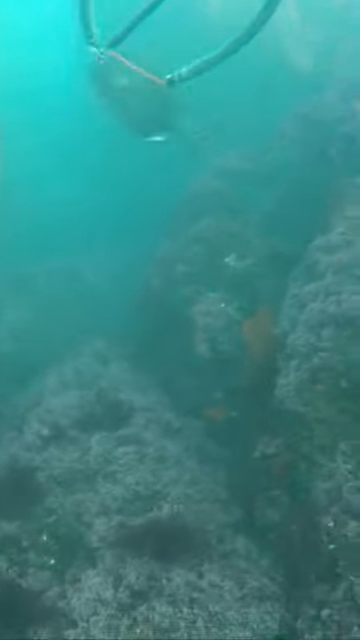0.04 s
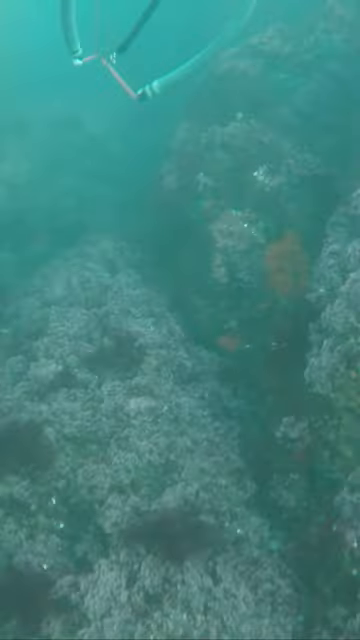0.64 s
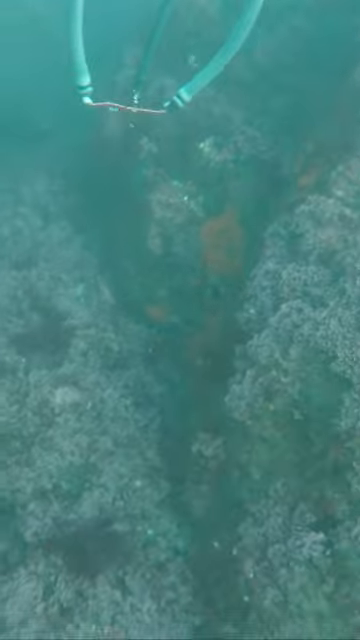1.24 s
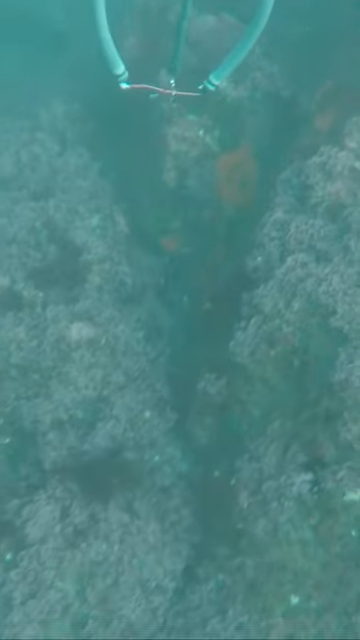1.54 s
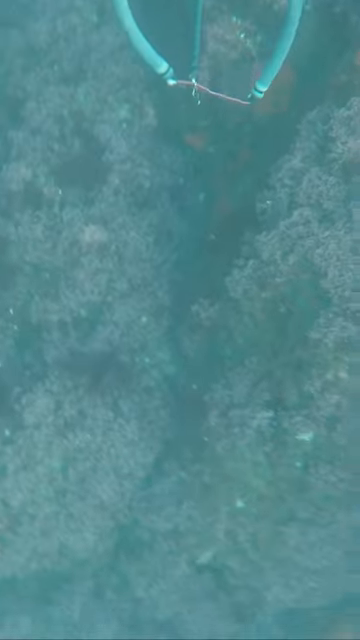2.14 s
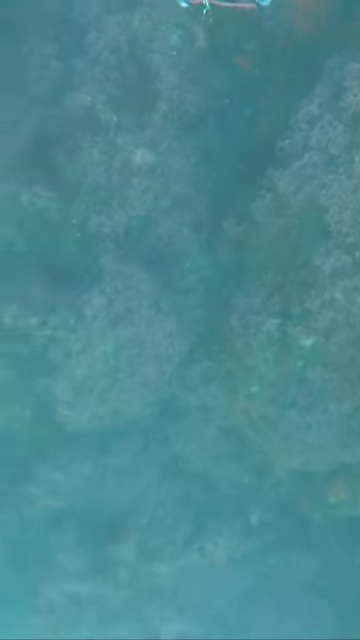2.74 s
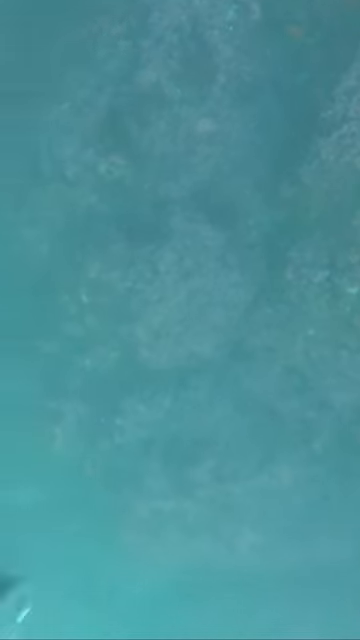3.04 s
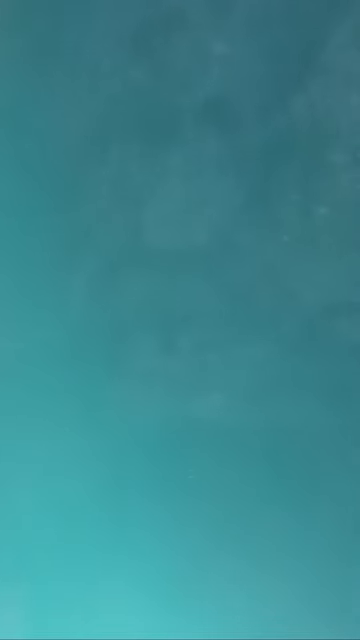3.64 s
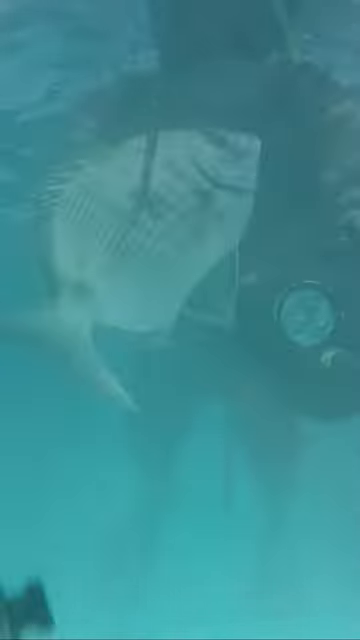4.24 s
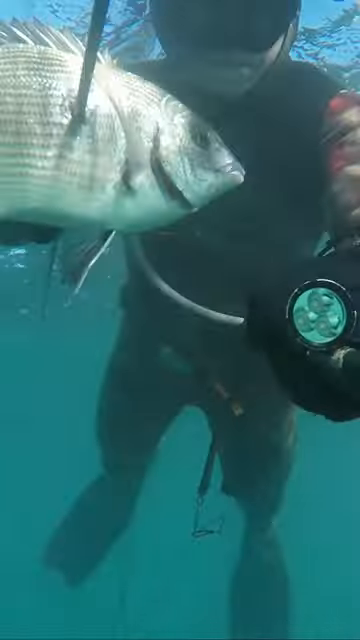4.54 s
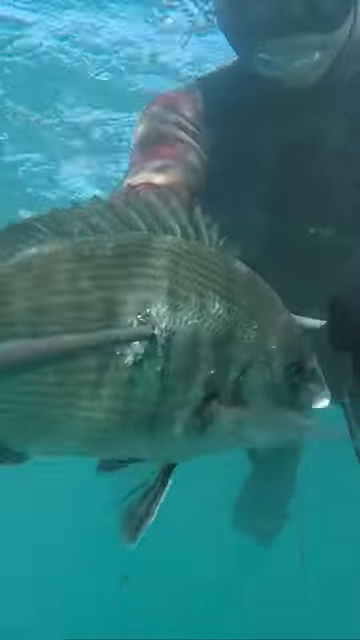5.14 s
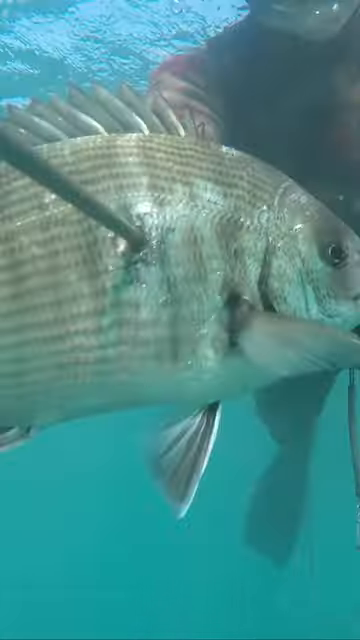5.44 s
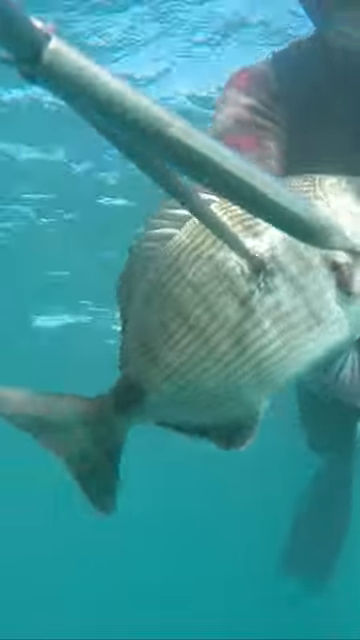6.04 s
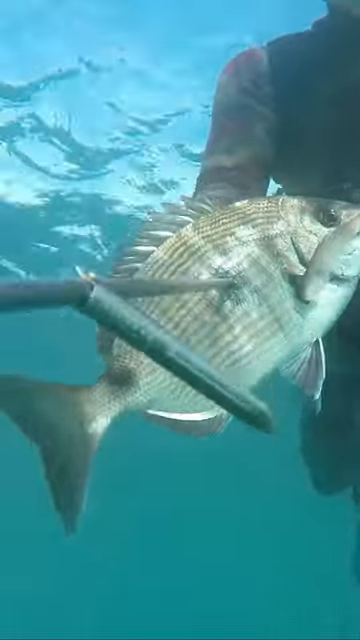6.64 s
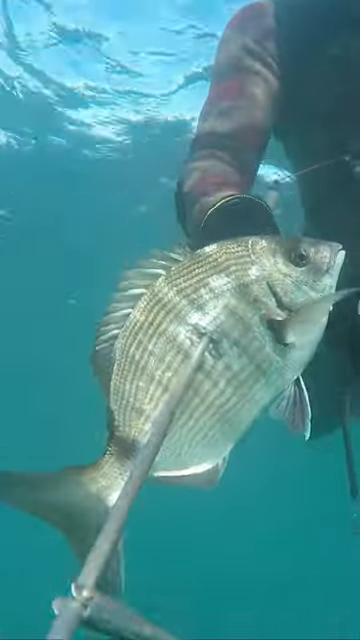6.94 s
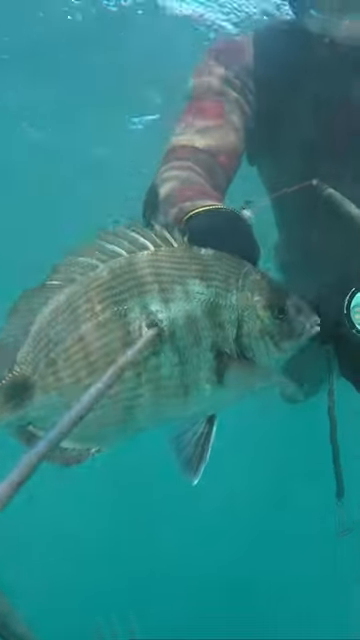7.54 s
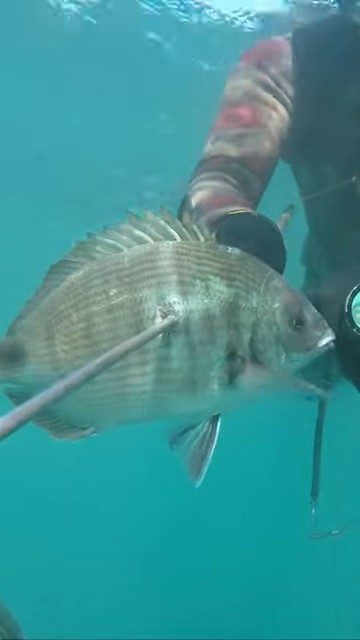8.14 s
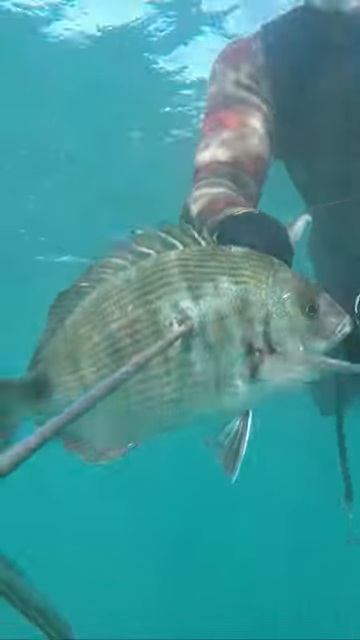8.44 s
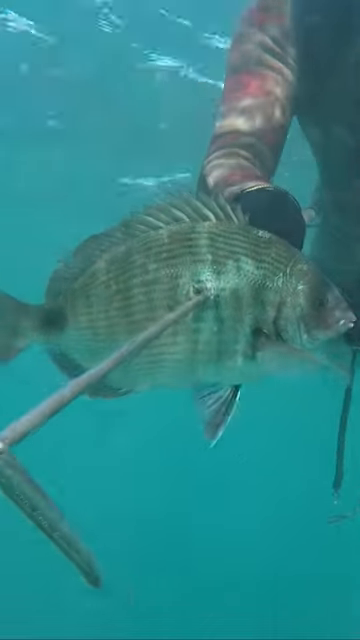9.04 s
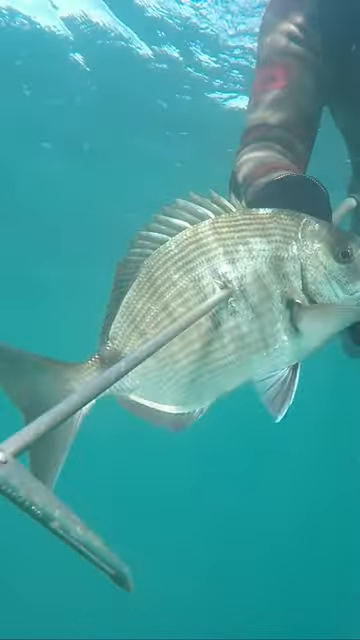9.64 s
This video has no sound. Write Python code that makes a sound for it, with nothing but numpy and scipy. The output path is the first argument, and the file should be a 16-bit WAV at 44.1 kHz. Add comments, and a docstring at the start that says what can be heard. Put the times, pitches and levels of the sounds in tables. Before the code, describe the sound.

Deep underwater rumble with snapping shrimp crackling and small bubbles gurgling, broken by a loud burst of knocks and rubs on the camera housing.

```python
"""A deep, surging underwater rumble: moving water pushes on a camera housing carried by a diver.
Snapping shrimp crackle all round the rocky reef, and small bubbles gurgle, fizz and pop. Midway the camera
turns to open water: the crackle rings its front window and a wave washes overhead. The case is knocked,
shoved and rubbed, once hard enough to make the limiter duck everything for a moment."""
import sys
import numpy as np
from scipy import signal
from scipy.fft import rfft, irfft, next_fast_len
from scipy.io import wavfile
from scipy.ndimage import map_coordinates

SR = 44100
rng = np.random.default_rng(int(sys.argv[2]) if len(sys.argv) > 2 else 0)


def int16_out(signal):
    """Quantize to a 16-bit WAV file."""
    q = np.round(np.clip(np.atleast_2d(signal).T, -1, 1) * 32767)
    wavfile.write(sys.argv[1], SR, q.astype(np.int16))


N = 432180
TURN_S, TURN_LENGTH_S = 4.44, 0.022  # the camera turns from the reef to open water

# push of the water on the case: t/s, relative level/dB
WATER_PUSH = [(0.0, 3), (0.3, 1), (1.1, -10), (1.42, -2.5), (1.72, -11.5), (1.84, -6.5), (2.05, -9.5),
              (2.6, -2.5), (2.8, -12.5), (3.48, -5.5), (3.68, -10.5), (4.4, -7.5), (4.52, -4), (4.8, -2.5),
              (5.0, 1), (5.12, -13), (5.26, 5), (5.37, -10), (5.52, 5.5), (5.76, -0.5), (6.44, 11),
              (6.8, 16), (6.96, -2), (7.2, 5.5), (7.4, -2), (7.72, -2), (8.0, 4.5), (8.24, -13), (8.35, -1),
              (8.52, 7), (8.75, 3.5), (8.92, -0.5), (9.14, 2.5), (9.8, -14)]
# tone of the sub-bass sway, the bass buffeting and the low-mid eddies: f/Hz, level/dB
SWAY_EQ = [(8,-22),(15,-8.5),(20.5,-0.5),(27,-5.5),(40,-28.5),(70,-98.5),(200,-125)]
BUFFET_EQ = [(20,-35),(34,2),(46,-1.5),(62,-6),(80,-26),(130,-33.5),(300,-62.5),(800,-125)]
EDDY_EQ = [(50,-24.5),(90,7),(115,6),(155,-3),(200,-8),(300,-11.5),(390,-13),(520,-14),(900,-36.5),(3000,-110)]


def water_rumble():
    """Water sways and buffets the case and sheds eddies at its edges; all three grow with the flow."""
    flow_db, = curves(WATER_PUSH)
    sway_db = -33.5 + 0.66 * flow_db + wobble(rate=5, depth_db=1.5)
    sway = amp(sway_db) * swell(SWAY_EQ, evenness=.7)
    buffet_db = -43 + 0.82 * flow_db + wobble(rate=9, depth_db=2.5)
    buffet = amp(buffet_db) * swell(BUFFET_EQ, evenness=.4)
    eddy_db = turned(reef=-61, open_water=-65.5) + 0.34 * flow_db + wobble(rate=12, depth_db=2.8)
    return sway + buffet + amp(eddy_db) * swell(EDDY_EQ, evenness=0.088)


def swell(eq, evenness):
    """Low random pressure waves of rms 1, with their beats partly evened out."""
    wave = coloured(rng.standard_normal(N + SR), eq, size=32768)[SR:]
    envelope = np.abs(signal.hilbert(unit(wave)))
    return unit(wave / (envelope + 1.1) ** evenness)


# blows on the case: t/s, peak level/dB, hardness f/Hz
CASE_KNOCKS = [(0.886,-33,3020),(1.426,-42.5,1400),(2.154,-46,600),(4.36,-43,497),(5.026,-43,1300),(5.860,-32.5,1000),(6.379,-11,795),(6.396,-13,896),(6.476,-9,2980),(6.483,-14.5,1200),(6.526,-9,1590),(6.531,-26,2000),(6.546,-27,1780),(6.575,-23.5,900),(8.166,-42.5,1300),(8.582,-46,1010),(8.733,-41,1000)]
# soft shoves and dull thuds: centre t/s, peak level/dB, f/Hz, half length/s
CASE_SHOVES = [(0.894,-35,74.6,0.0075),(1.225,-43,118,0.015),(1.432,-24.5,32,0.013),(2.421,-46,51.5,0.047),(2.601,-37.5,55.7,0.019),(3.391,-38.5,90,0.02),(3.484,-45,132,0.02),(4.383,-33.5,61.7,0.024),(4.697,-25.5,77.6,0.0084),(4.74,-28,104,0.0092),(4.775,-48,145,.014),(4.823,-36,106,0.0049),
               (5.813,-30,270,0.0012),(5.832,-31,390,0.005),(5.837,-20.5,104,0.01),(5.851,-17,63,0.0052),(5.882,-22,29.8,0.042),(6.35,-22,185,0.0064),(6.374,-13,75.6,0.0059),(6.411,-13,100,0.0073),(6.542,-2,39,0.017),(6.546,-20,102,0.017),(6.58,-10.5,26.5,0.023),(7.964,-20,51,0.025),(8.579,-25,22.88,0.24)]
# rubs along the case: t/s, length/s, level/dB, hardness f/Hz
CASE_RUBS = [(0.308, 0.016, -57, 400), (1.187, 0.096, -52, 60), (4.675, 0.097, -49.5, 110),
             (5.513, .13, -56, 457), (5.808, 0.035, -33.5, 130), (6.26, 0.095, -48, 1020),
             (6.331, 0.032, -28.5, 400), (6.376, 0.017, -20.5, 500), (6.408, 0.031, -20.5, 1000),
             (6.436, 0.035, -24, 1300), (6.479, 0.01, -20, 1110), (8.35, 0.45, -61, 258),
             (9.323, 0.087, -53, 557)]


def handling():
    """Knocks and stick-slip rubs ring the case; shoves rock it with a low thud."""
    out, t = np.zeros(N), np.arange(SR // 2) / SR
    for s, db, hard_hz in CASE_KNOCKS:
        blow = (t == 0) + 0.094 * rng.standard_normal(len(t)) * decay(t, t60=0.03)
        add(out, s, amp(db) * peak(housing(blow, hard_hz)))
    centred = t - t.mean()
    for s, db, hz, half_s in CASE_SHOVES:
        thud = np.cos(2 * np.pi * hz * centred) * np.exp(-(centred / half_s) ** 2)
        add(out, s - t.mean(), amp(db) * thud)
    for s, length, db, hard_hz in CASE_RUBS:
        slips = impulses(rate=2500, spread_db=2.5, most_db=6)[:len(t)]
        pressure = np.clip(np.minimum(t, length - t) / (.16 * length), 0, 1)
        rub = housing(slips * pressure, hard_hz)
        rms = np.sqrt(np.sum(rub ** 2) / (length * SR))
        add(out, s, amp(db) * rub / rms)
    return out


# resonances of the housing: f/Hz, width/Hz, level/dB
CASE_MODES = [(110,12,8.5),(185,22,1.5),(235,17,-6),(345.5,55,2.5),(409,61.5,4.5),(510,52,-1.5),(680,39.6,5),(973,52,-5.5),(1005,51,-4),(1570,180,-4.5),(1850,190,-4),(2550,320,-16),(3320,310,-14.5)]


def housing(force, hard_hz, wall_hz=4500):
    """The case rings; a softer contact reaches fewer modes, and the wall rolls off the top."""
    def response(f):
        contact = (1 + 1j * f / hard_hz) ** -2
        return resonances(CASE_MODES, f) * contact / np.sqrt(1 + (f / wall_hz) ** 6)
    return filtered(force, response)


# foreground claw snaps: t/s, peak level/dB, treble shelf/dB, echo level/dB
CLAW_SNAPS = [(0.0915, -39.5, -28, -4), (0.333, -43.5, 9, 4), (0.9128, -42, -6, 4), (1.2291, -31.5, -9, -7),
              (1.2447, -41, -18, -17), (1.3437, -30.5, -5, -3), (1.499, -34, 6, -8), (1.925, -39, -2, -10),
              (2.228, -32, -16, -23), (2.2757, -33.5, -12, 0), (2.4204, -41, -18, -14),
              (2.7173, -36, 5, -17), (3.0547, -37, 2, -14), (3.1243, -35, -1, 14), (3.479, -37, 2, -8),
              (4.202, -37, -16, 0), (4.289, -37.5, -9, -14), (4.3953, -35, -32, -11),
              (4.425, -27.5, -12, -20), (5.2052, -42.5, -6, 4), (5.3079, -27, 0, -25),
              (5.3472, -36.5, 5, -7), (5.612, -44, 4, 4), (5.6756, -48, 13, -17), (5.953, -24, 12.5, -15),
              (6.294, -37, -20, 0), (6.573, -35, 6, 1), (7.1065, -25.5, -17, -10), (7.352, -47, 18.5, -21),
              (7.431, -41, -10, 23), (7.6, -41, -14, 10), (7.6285, -36.5, -28, 13),
              (7.7824, -32.5, -15, -21), (7.9579, -34, 4, -14), (7.974, -39.5, -8, 5), (8.1395, -46, -1, 8),
              (8.201, -41, -17, 17), (8.46, -42.5, -14, 25), (8.568, -38, -23, -1), (8.675, -42.5, -4, -2),
              (8.708, -41, -5, -1), (8.8005, -38.5, 23, -29), (8.918, -56, 14, -15),
              (9.3537, -34.5, -15, -8.5), (9.4618, -18.5, -9, -10.5)]


def near_shrimp():
    """Single shrimp snap their claws close by."""
    out = np.zeros(N)
    for s, db, treble_db, echo_db in CLAW_SNAPS:
        add(out, s, amp(db) * peak(snap(echo_db, treble_db)))
    return out


# tone of a snap through the wall of the case: f/Hz, level/dB
SNAP_EQ = [(400,-18),(1300,-17),(1700,2.5),(2100,-5.5),(2650,-2),(3700,-1),(4650,-7),(5800,-7),(6600,-10.5),(7700,-11),(9400,-19),(10500,-13.5),(13000,-17.5),(15500,-21)]


def snap(echo_db, treble_db, shelf_hz=6000):
    """One crack, with a short tail scattered off rocks and surface."""
    t = np.arange(SR // 8) / SR
    direct = 1.6 * decay(t, t60=.003) + .7 * decay(t, t60=.016)
    echo = amp(echo_db) * decay(t, t60=.11)
    crack = coloured(rng.standard_normal(len(t)) * (direct + echo), SNAP_EQ)
    return filtered(crack, lambda f: amp(treble_db * f * f / (f * f + shelf_hz ** 2)))


# fader ride of the shrimp bed: t/s, level/dB
SHRIMP_RIDE = [(0, -69.5), (.35, -63), (1.05, -69.5), (1.3, -65), (2.2, -64), (4, -65), (4.8, -64),
               (5.3, -62), (6.2, -61.5), (6.8, -61.5), (7.5, -63.5), (8.35, -64), (8.55, -62.5), (9.4, -63),
               (9.8, -61.5)]


def shrimp_bed():
    """Colonies snap in flurries, each with its own colour; the farthest merge into a sizzle."""
    level_db = curves(SHRIMP_RIDE)[0] + wobble(rate=9, depth_db=1.3)
    colonies = np.zeros(N)
    for hz in np.geomspace(2200, 11000, num=12):
        flurries = amp(wobble(rate=4, depth_db=5))
        claws = impulses(rate=9 * flurries, spread_db=4, most_db=12)
        crack = coloured(snap(echo_db=-3, treble_db=-2), [(hz / 2, -11), (hz, 0), (hz * 2, -16)])
        colonies += signal.oaconvolve(unit(claws), crack)[:N]
    sizzle = coloured(rng.standard_normal(N), SNAP_EQ)
    sizzle = coloured(sizzle, [(11000, 0.0051), (15000, 8)])  # air at the very top
    bed = unit(unit(colonies) + 0.61 * unit(sizzle))
    return amp(level_db) * (bed + amp(-15.5) * dry_ticks(rate=9, colours=8))


# tone of the dry ticks: f/Hz, level/dB
TICK_EQ = [(1500,-20.5),(3500,-3),(7500,7.5),(11000,-4.5),(15500,-8)]


def dry_ticks(rate, colours):
    """Crisp little snaps that arrive with no echo."""
    t = np.arange(SR // 50) / SR
    ticks = np.zeros(N)
    for crack in rng.standard_normal((colours, len(t))) * decay(t, t60=.004):
        ticks += signal.oaconvolve(impulses(rate / colours, spread_db=2, most_db=15.5), crack)[:N]
    return unit(coloured(ticks, TICK_EQ))


# resonances of the front window: f/Hz, width/Hz, level/dB
WINDOW_MODES = [(2520,1460,-4.5),(4015,390,2.5),(4980,390,-5),(6000,140,4.5),(7750,760,0.5),(10470,1900,-1.5)]


def through_window(crackle):
    """Once the camera faces open water, the crackle rings the front window."""
    hz = np.geomspace(300, 16000, num=200)
    gain_db = 20 * np.log10(np.hypot(.55, np.abs(resonances(WINDOW_MODES, hz))))
    return turned(crackle, coloured(crackle, np.column_stack([hz, gain_db])))


# single bubbles close to the case: t/s, peak level/dB, f/Hz, ring length/cycles
CLOSE_BUBBLES = [(.885, -28.5, 1540, 5.6), (1.068, -44.5, 807, 36), (1.208, -43.5, 783, 49),
                 (1.277, -38, 2570, 80), (1.286, -42.5, 910, 20), (1.286, -30.5, 2450, 63),
                 (1.351, -43, 745, 24), (1.403, -34.5, 2055, 110), (1.403, -39.5, 694, 40),
                 (1.465, -34.5, 1780, 53), (1.466, -43, 760, 20), (1.514, -39.5, 722, 52),
                 (1.588, -38.5, 1714, 130), (1.592, -45, 660, 35), (1.866, -43, 2560, 170),
                 (2.254, -38.5, 1100, 44), (2.258, -36.5, 2290, 44), (2.492, -38.5, 680, 74),
                 (2.687, -38, 715, 48), (2.955, -39.5, 1834, 61), (3.144, -35, 1803, 160),
                 (3.143, -43.5, 1510, 180), (3.147, -43, 810, 38), (3.279, -45, 814, 74),
                 (3.33, -45.5, 698, 49), (3.476, -31.5, 820, 55), (3.483, -34, 1800, 91),
                 (3.659, -45.5, 1815, 210), (4.007, -43.5, 1630, 160), (4.305, -42.5, 760, 16),
                 (4.724, -45, 1695, 74), (5.113, -47.5, 760, 35), (5.263, -47.5, 980, 93),
                 (5.861, -38, 1550, 3.6), (5.933, -47, 644, 21), (6.093, -44, 640, 25),
                 (6.571, -32.5, 1780, 190), (7.39, -47.5, 746, 17), (9.631, -35, 688, 24),
                 (9.703, -45.5, 644, 51)]
# bubbles breaking up on the case: t/s, peak level/dB
CLOSE_POPS = [(1.394, -40), (1.429, -55), (2.026, -41), (2.11, -41), (2.307, -43), (2.345, -37),
              (2.380, -37), (2.453, -43), (2.466, -34), (2.47, -35), (2.4959, -36), (2.5039, -26.5),
              (2.511, -29), (2.5257, -33.5), (2.549, -35.5), (2.5657, -34), (2.573, -38.5), (2.591, -35),
              (2.613, -46), (2.655, -45)]


def near_bubbles():
    """Close bubbles pinch off with a splash around their own pitch and ring; others break with a pop."""
    out, t = np.zeros(N), np.arange(SR // 8) / SR
    for s, db, hz, cycles in CLOSE_BUBBLES:
        spray = rng.standard_normal(len(t)) * decay(t, t60=0.013 + 0.6 * cycles / hz)
        band = [(hz / 3, -36), (hz * .72, -9), (hz, 0), (hz * 1.33, -9), (hz * 2.2, -35), (hz * 6, -58)]
        splash = peak(coloured(spray, band))
        add(out, s, amp(db) * peak(bubble(t, hz, cycles, glide=-.03) + .7 * splash))
    for s, db in CLOSE_POPS:
        add(out, s, amp(db) * peak(dry_pop()))
    return out


def bubble(t, hz, cycles, glide):
    """A bubble swings up within a cycle or two, then rings down while its pitch glides."""
    age = hz * t / cycles
    attack = (1 - np.exp(-hz * t)) ** 2
    return np.sin(2 * np.pi * hz * t * (1 + glide * age)) * attack * decay(t, t60=cycles / hz)


# tone of a dry pop: f/Hz, level/dB
POP_EQ = [(450,-28),(700,-4.5),(1200,-11),(1550,4),(2350,2),(2900,-26.5),(3400,-4.5),(4300,-25.5),(9000,-36)]


def dry_pop():
    """A bubble breaks up: a short dry spray, pitched a little differently each time."""
    t = np.arange(SR // 8) / SR
    detune = np.exp(.07 * rng.standard_normal())
    spray = rng.standard_normal(len(t)) * decay(t, t60=0.019)
    return coloured(spray, [(hz * detune, db) for hz, db in POP_EQ])


# fader ride of the drifting bubbles: t/s, gurgle level/dB, fizz level/dB
BUBBLE_RIDE = [(0, -65.5, -86), (.17, -61.5, -72), (.4, -86, -77), (.65, -65, -67.5), (1.15, -79, -79.5),
               (1.3, -61, -72), (1.55, -61, -66), (1.8, -63.5, -66.5), (2.2, -66.5, -56),
               (2.55, -53.5, -60), (2.8, -63.5, -68), (3.25, -60.5, -66.5), (3.7, -65.5, -72.5),
               (4.7, -67.5, -86), (4.98, -71, -68), (5.1, -59.5, -67.5), (5.45, -68, -71.5),
               (7.2, -65.5, -77.5), (8.9, -65, -72), (9.8, -66.5, -72.5)]
# tone of the large gurgling bubbles and of the small fizzing ones: f/Hz, level/dB
GURGLE_EQ = [(250,-47),(520,-3),(670,4),(800,0.5),(970,-2),(1200,-17),(2000,-53.5)]
FIZZ_EQ = [(400, -26), (660, -4), (850, -12.5), (1080, 0), (1300, -2.5), (1650, 4), (2050, -10.5),
           (2450, 10), (2950, -20), (3550, -7), (4200, -38), (5000, -26), (9000, -37)]


def bubble_stream():
    """Bubbles drift past, thickest over the reef: large ones gurgle, small ones fizz and sputter."""
    gurgle_db, fizz_db = curves(BUBBLE_RIDE)
    near = bubble_cloud(centre_hz=810, scatter=0.2, cycles=22, count=1100)
    far = bubble_cloud(centre_hz=760, scatter=0.28, cycles=13, count=3500)
    gurgle = unit(coloured(turned(reef=near, open_water=far), GURGLE_EQ))
    small = bubble_cloud(centre_hz=1900, scatter=.45, cycles=4, count=9000, spread_db=3)
    tiny = unit(impulses(rate=660, spread_db=8, most_db=9))  # the tiniest only tick
    fizz = unit(coloured(small + 2.2 * tiny, FIZZ_EQ))
    fizz = unit(fizz + amp(-0.5) * sputter(rate=170, colours=8))
    return amp(gurgle_db + wobble(rate=16, depth_db=3)) * gurgle + amp(fizz_db) * fizz


def bubble_runs():
    """A short run of big, low glugs and a trail of small ringing blips drift by."""
    glugs = bubble_cloud(centre_hz=202, scatter=0.36, cycles=5.2, count=1500)
    blips = bubble_cloud(centre_hz=1550, scatter=0.22, cycles=45, count=450)
    return (glugs * pass_by(middle_s=4.07, half_s=0.18, db=-55.5)
            + blips * pass_by(middle_s=3.5, half_s=0.66, db=-65.5))


def bubble_cloud(centre_hz, scatter, cycles, count, spread_db=3.5):
    """Many bubbles of random strength and pitch; some only tick, some ring."""
    t = np.arange(int(1.5 * SR * cycles / centre_hz)) / SR
    start = rng.integers(0, N, (count, 1))
    hz = centre_hz * np.exp(scatter * rng.standard_normal((count, 1)))
    life = cycles * np.exp(.5 * rng.standard_normal((count, 1)))
    strength = amp(spread_db * np.minimum(rng.exponential(size=(count, 1)), 3))
    fade_out = 1 - (t / t[-1]) ** 4
    rings = strength * bubble(t, hz, life, glide=0.055) * fade_out
    positions = start + np.arange(len(t))
    return unit(np.bincount(positions.ravel(), rings.ravel(), N)[:N])


def sputter(rate, colours):
    """Bubbles break in weak dry pops at random times."""
    out = np.zeros(N)
    for _ in range(colours):
        out += signal.oaconvolve(impulses(rate / colours, spread_db=4.5, most_db=9.5), dry_pop())[:N]
    return unit(out)


# hollow tone of the surf through the case: f/Hz, level/dB
SURF_EQ = [(200,-20.5),(400,-10),(540,-12),(660,2.5),(790,-13),(1000,-8.5),(1250,-24.5),(1650,-9.5),(1850,-4),(2150,-46),(4000,-29),(8000,-41)]


def surf(crest_s=4.70, crest_db=-54.5, rise_s=0.06, fade_s=0.2):
    """Distant waves make a steady wash; one overhead rises quickly and fades."""
    age = np.arange(N) / SR - crest_s
    wave = np.clip(1 + age / rise_s, 0, 1) * np.exp(-np.maximum(age, 0) / fade_s)
    level = np.hypot(amp(turned(reef=-71, open_water=-67.5)), amp(crest_db) * wave)
    return level * unit(coloured(rng.standard_normal(N), SURF_EQ))


def turned(reef, open_water):
    """Crossfade as the camera turns away from the reef."""
    facing = np.clip((np.arange(N) / SR - TURN_S) / TURN_LENGTH_S, 0, 1)
    return (1 - facing) * reef + facing * open_water


def pass_by(middle_s, half_s, db):
    """The gain of something that drifts up to the camera and away again."""
    return amp(db) * np.exp(-((np.arange(N) / SR - middle_s) / half_s) ** 2)


def wobble(rate, depth_db):
    """A smooth random level in dB, through rate points a second."""
    points = rng.standard_normal(int(N * rate / SR) + 4)
    return depth_db * map_coordinates(points, [np.arange(N) * rate / SR])


def impulses(rate, spread_db, most_db):
    """Random clicks, about rate a second: many weak, a few strong."""
    strength = amp(np.minimum(spread_db * rng.exponential(size=N), most_db))
    return strength * rng.choice([-1, 1], N) * (rng.random(N) < rate / SR)


def resonances(modes, f):
    """Complex response of a bank of modes of alternating polarity."""
    return sum((-1) ** k * amp(db) * 1j * f * width / (hz * hz - f * f + 1j * f * width)
               for k, (hz, width, db) in enumerate(modes))


def coloured(x, eq, size=4096):
    """Minimum-phase EQ through points of f/Hz, level/dB."""
    hz, db = np.transpose(eq)
    gain = amp(np.interp(np.log(np.fft.rfftfreq(size, 1 / SR) + 1), np.log(hz), db))
    cepstrum = irfft(np.log(gain))
    causal_fold = 1 + np.sign(size // 2 - np.arange(size)) * (np.arange(size) > 0)
    return signal.fftconvolve(x, irfft(np.exp(rfft(cepstrum * causal_fold))))[:len(x)]


def filtered(x, response):
    """Filter x with a complex response of frequency."""
    size = next_fast_len(len(x) + SR // 2)
    return irfft(rfft(x, size) * response(np.fft.rfftfreq(size, 1 / SR)), size)[:len(x)]


def curves(rows):
    """One value per sample for each column after the time."""
    times, *columns = np.transpose(rows)
    return [np.interp(np.arange(N) / SR, times, column) for column in columns]


def add(track, s, sound):
    """Mix a sound into the track at time s."""
    part = track[max(0, round(s * SR)):][:len(sound)]
    part += sound[:len(part)]


def decay(t, t60):
    """A tail that falls 60 dB in t60 seconds."""
    return amp(-60 * t / t60)


def amp(db):
    """Decibels to gain."""
    return 10 ** (np.asarray(db) / 20)


def unit(x):
    """Scale to rms 1."""
    return x / np.sqrt(np.mean(x ** 2) + 1e-20)


def peak(x):
    """Scale to peak 1."""
    return x / (np.abs(x).max() + 1e-12)


def scene():
    """The mono mix inside the housing."""
    foreground = water_rumble() + handling()
    shrimp = through_window(near_shrimp() + shrimp_bed())
    bubbles = near_bubbles() + bubble_stream() + bubble_runs()
    return (foreground + shrimp + bubbles + surf())[None]


def limiter(x, ceiling_db, hold_s, release_s, block=64):
    """The gain drops at once on a peak, is held, then creeps back."""
    peaks = np.abs(np.pad(x, (0, -len(x) % block))).reshape(-1, block).max(1)
    over_db = np.maximum(20 * np.log10(peaks + 1e-9) - ceiling_db, 0)
    blocks = np.arange(len(peaks))
    t, cut_db = (blocks + .5) * block / SR, np.zeros(len(peaks))
    for k in np.flatnonzero(over_db):
        duck = np.clip(1 - (t - t[k] - hold_s) / release_s, 0, 1) * (blocks >= k - 1)
        cut_db = np.maximum(cut_db, over_db[k] * duck)
    return x * amp(-np.interp(np.arange(len(x)) / SR, t, cut_db))


def record(dry):
    """The camera limits peaks and cuts off the extreme treble."""
    limited = limiter(dry[0], ceiling_db=-10.4, hold_s=0.41, release_s=0.45)
    return filtered(limited, lambda hz: hz < 15500)[None]


dry = scene()
out = record(dry)
int16_out(out)
```